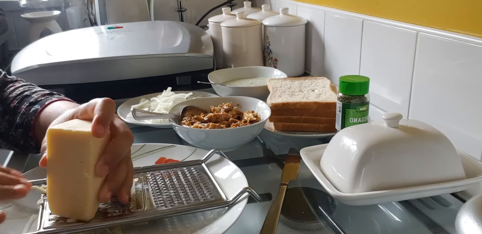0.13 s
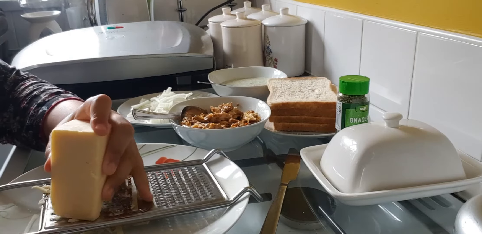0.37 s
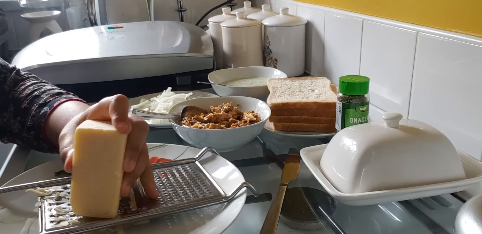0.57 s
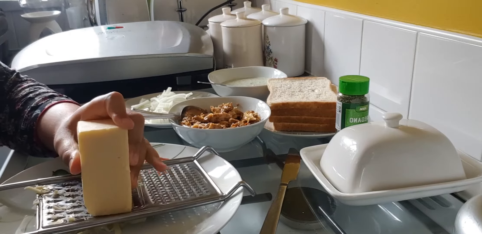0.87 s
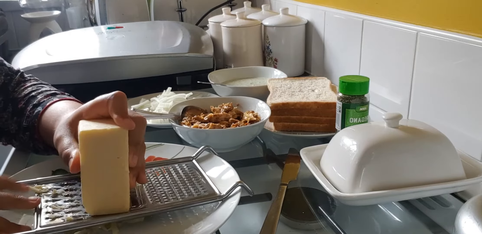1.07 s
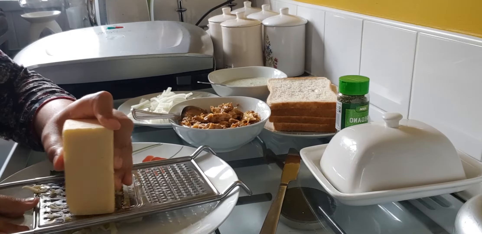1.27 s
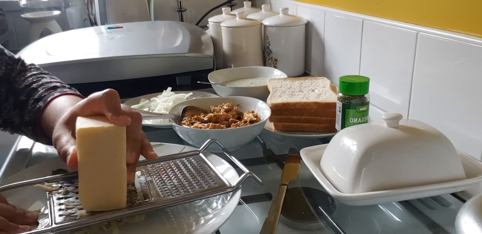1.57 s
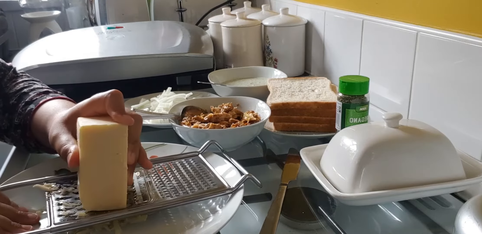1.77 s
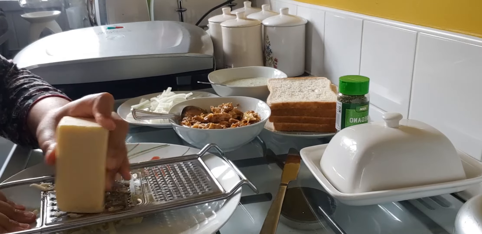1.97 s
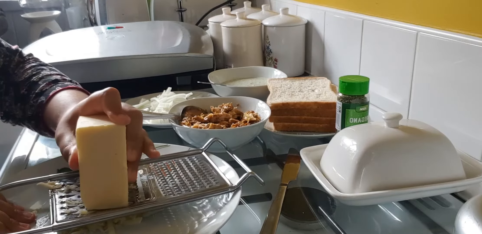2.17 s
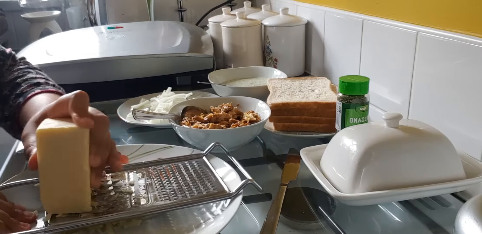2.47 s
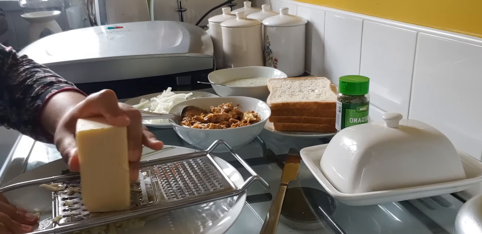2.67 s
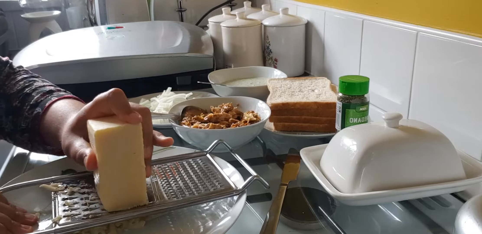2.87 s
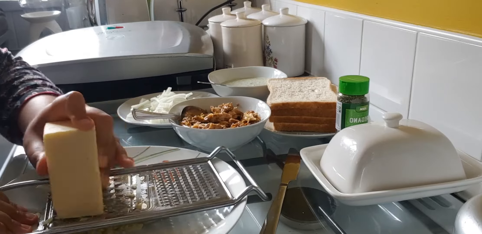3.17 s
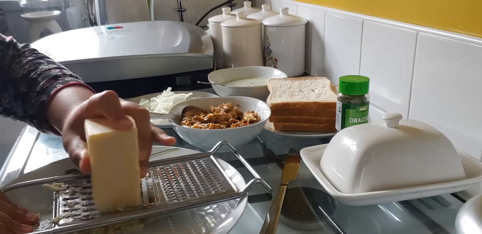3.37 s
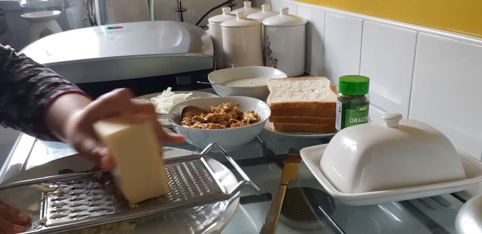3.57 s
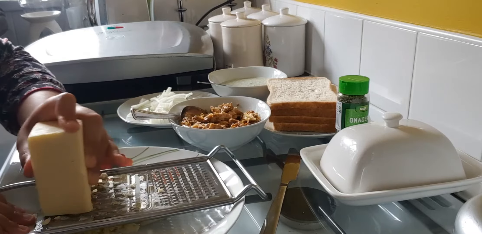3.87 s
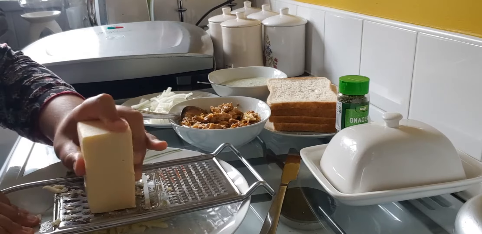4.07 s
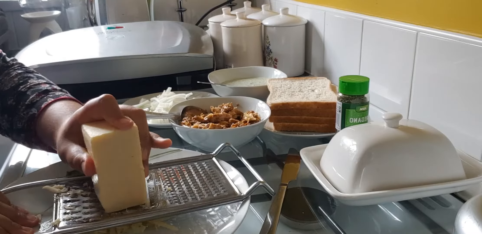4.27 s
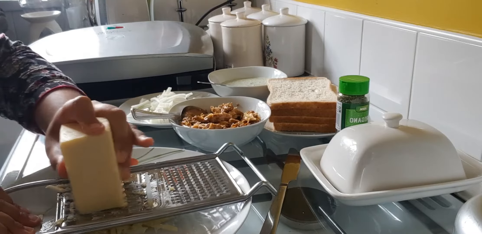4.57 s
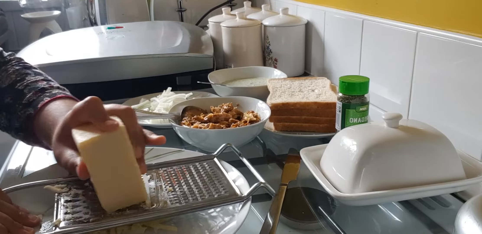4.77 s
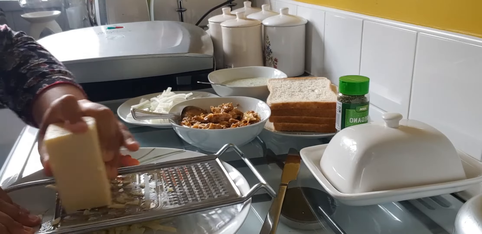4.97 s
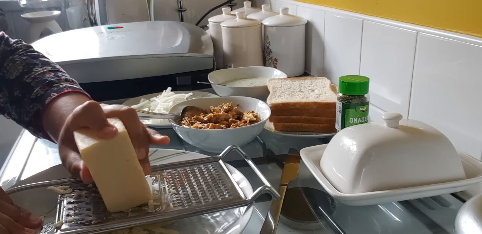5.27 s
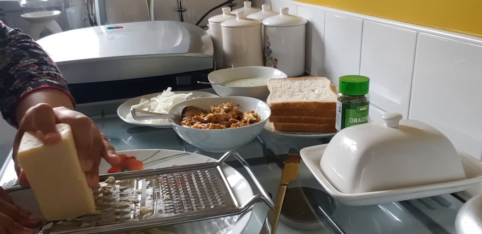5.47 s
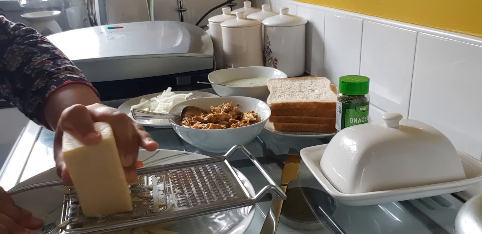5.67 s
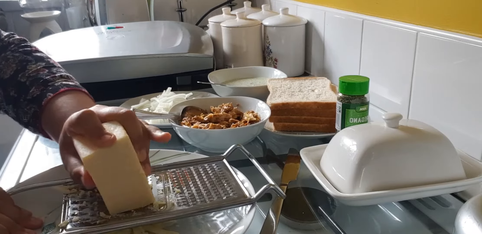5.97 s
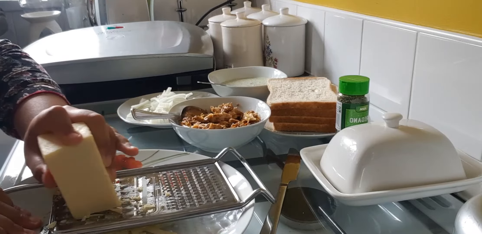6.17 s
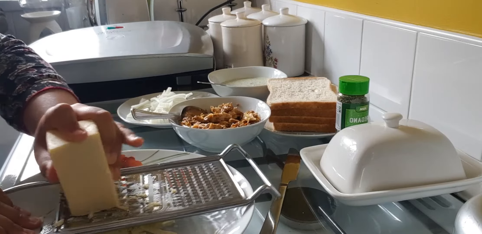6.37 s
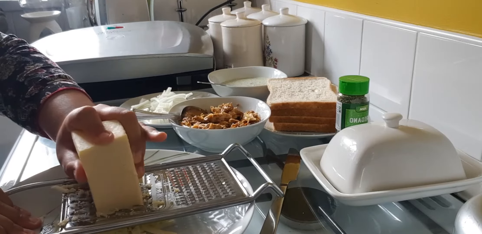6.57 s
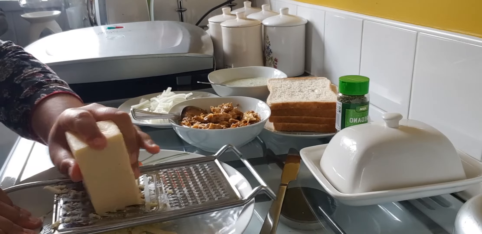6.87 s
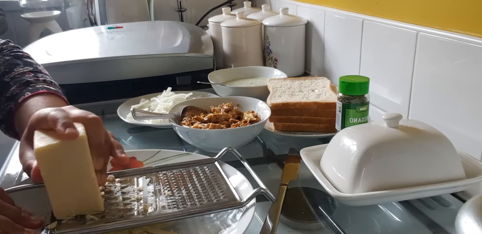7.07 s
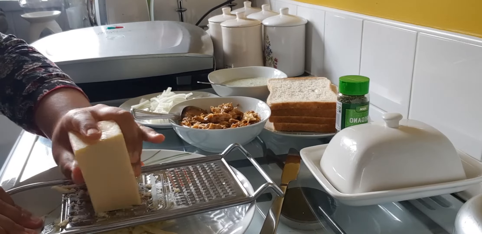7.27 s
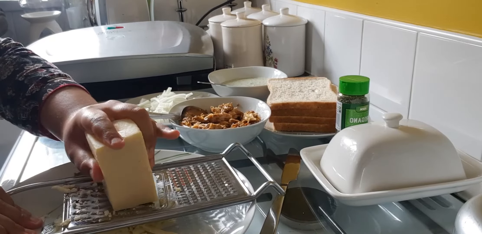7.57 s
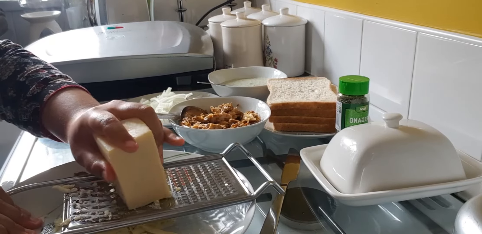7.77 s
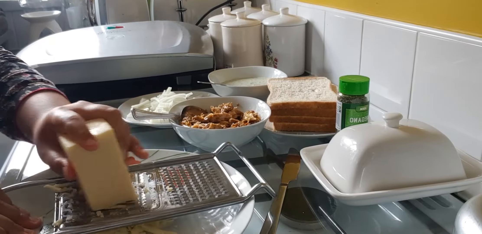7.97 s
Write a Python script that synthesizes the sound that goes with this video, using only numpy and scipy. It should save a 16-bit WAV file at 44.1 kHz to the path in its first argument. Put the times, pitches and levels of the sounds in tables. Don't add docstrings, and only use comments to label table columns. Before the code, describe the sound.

A block of cheese rasps unevenly along a steel grater, the loose metal clacking and ringing on a plate in a small tiled kitchen.

```python
import sys
import numpy as np
from scipy import signal
from scipy.fft import rfft, irfft, next_fast_len
from scipy.io import wavfile
from scipy.ndimage import uniform_filter1d

SR = 44100
rng = np.random.default_rng(int(sys.argv[2]) if len(sys.argv) > 2 else 0)


def put_to_file(sound):
    columns = np.atleast_2d(sound).T
    safe = np.clip(columns, -1, 1)
    whole_steps = np.round(safe * 32767)
    wavfile.write(sys.argv[1], SR, whole_steps.astype(np.int16))


def gain_from_db(level_db):
    decades = np.asarray(level_db, float) / 20
    return 10 ** decades


N = 380583
SWING_DB = 22


def evened(x):
    return x / np.sqrt(np.mean(x ** 2) + 1e-20)


def read(points, hz):
    f, value = np.transpose(points)
    return np.interp(np.log(hz + 1), np.log(f + 1), value)


def add(mix, s, sound):
    part = mix[..., round(s * SR):][..., :sound.shape[-1]]
    part += sound[..., :part.shape[-1]]


def resonate(x, hz, width_hz):
    b, a = signal.iirpeak(hz, hz / width_hz, SR)
    return signal.lfilter(b, a, signal.lfilter(b, a, x))


def causal(points):
    hz = np.linspace(0, SR / 2, 1025)
    return signal.minimum_phase(signal.firwin2(1023, hz, gain_from_db(2 * read(points, hz)) + 1e-9, fs=SR))


BAND_HZ = (3500, 700, 1600, 9000)


def bands(x, span):
    size = next_fast_len(x.shape[-1] + 512)
    octave = np.log2(np.fft.rfftfreq(size, 1 / SR) + 1)
    bells = np.exp(-3 * (octave - np.log2(BAND_HZ)[:, None]) ** 2) + 1e-30
    weights = (bells / bells.sum(0))[:, None]
    parts = irfft(rfft(x, size) * weights, size)[..., :x.shape[-1]]
    return parts / np.sqrt(np.mean(parts[..., :span] ** 2, axis=(1, 2), keepdims=True))


# frequency in Hz, level in dB per Hz.
STEEL_COLOUR = [(150, -24.5), (300, -17.5), (500, 0.5), (800, 1), (1000, -6.5), (1400, 1), (2000, -1.5),
                (3500, -6.5), (4500, -10), (5200, -11), (8000, -2), (12000, -1.5), (15700, -12)]
# frequency in Hz, t60 in seconds.
HISS_DECAY = [(200, 0.22), (530, 0.26), (1400, 0.26), (3700, 0.26), (9700, 0.21)]
# frequency in Hz, level in dB, t60 in seconds.
GRATER_MODES = [(342, -12, 0.36), (517, -4.5, 0.076), (551, -2, 0.35), (643, -2, 0.045), (739, -3, 0.45),
                (1168, -6.5, 0.049), (1310, -6, 0.2), (1710, -0.5, 0.061), (1870, -2.5, 0.6),
                (1953, -5, 0.3), (2760, -9.5, 0.25), (3085, 2, 0.079), (3480, -5, 0.084), (3560, -5, 0.03),
                (4017, -16, 0.067), (4200, -15, 0.05), (4400, -9, 0.22), (6100, -18, 0.26),
                (7450, -20.5, 0.057), (8200, -19.5, 0.6), (10520, -30, 0.23), (11000, -7.5, 0.12)]
# frequency in Hz, share heard differently at each port.
APART = [(250, 0.071), (600, 0.29), (1200, 0.61), (2500, 0.73), (9000, 0.93)]


def steel(stretch, modes_db, scatter_db, crack_db):
    hz, t = np.fft.rfftfreq(128, 1 / SR), np.arange(-1, 500) * 32 / SR
    shared, own = signal.stft(rng.standard_normal((2, 2, 16000)), nperseg=128, noverlap=96)[2]
    apart = np.clip(read(APART, hz), 0, 1)[:, None]
    z = np.sqrt(1 - apart) * shared[0] + np.sqrt(apart) * own
    z *= gain_from_db(-60 * np.maximum(t, 0) / read(HISS_DECAY, hz)[:, None] / stretch)
    hiss = signal.istft(z, nperseg=128, noverlap=96)[1][:, :16000]
    t = np.arange(16000) / SR
    cracked = hiss * (1 + gain_from_db(crack_db) * np.exp(-t / 0.014))
    hiss = signal.oaconvolve(cracked, causal(STEEL_COLOUR)[None], axes=1)[:, :16000]

    f, db, t60 = np.transpose(GRATER_MODES)[:, :, None]
    chance = rng.standard_normal((3, 2, len(f), 1))
    phase = 2.6 * chance[2] * np.clip(read(APART, f), 0, 1)
    f = f * (1 + .003 * chance[0, 0])
    fall_db = 60 * t / np.minimum(t60, .25) / stretch
    waves = np.sin(np.float32(2 * np.pi * f * t + phase))
    modes = (gain_from_db(db + scatter_db * chance[1, 0] - fall_db) * waves).sum(1)
    return evened(evened(hiss) + gain_from_db(modes_db) * evened(modes)) / np.sqrt(16000)


# hardest moment in seconds, pressure in dB, rise in seconds, fall in seconds, dullness in dB.
STROKES = [(.436, -70, 0.018, 0.1, 9.5), (.734, -49.5, 0.021, 0.066, -4), (.872, -67, 0.06, 0.08, 3),
           (1.485, -47, 0.033, 0.088, 2.5), (2.127, -45, 0.043, 0.056, -2), (2.338, -57, 0.029, 0.16, 0),
           (2.44, -61.5, 0.063, 0.064, -8), (3.271, -56, 0.057, 0.087, 1), (3.489, -42, 0.011, 0.13, 8),
           (3.65, -47, 0.036, 0.084, 5), (4.352, -48, 0.0195, 0.12, -0.5),
           (4.541, -49, 0.0265, 0.071, -1.5), (4.83, -54.5, 0.031, 0.13, 9),
           (4.999, -50, 0.033, 0.072, 2.5), (5.2, -62.5, 0.082, 0.12, -13),
           (6.048, -48.5, 0.049, 0.056, 5.5), (6.19, -53, .03, 0.19, -11.5), (7.246, -58.5, .04, 0.045, 0),
           (7.896, -55, 0.058, .1, 1.5), (8.175, -52.5, 0.022, 0.078, 1.5), (8.227, -60, 0.035, 0.062, 1.5),
           (8.608, -64, 0.019, 0.11, 2.5)]
# slip in seconds, pressure in dB, rise in seconds, dullness in dB.
RUN_UPS = [(2.558, -57.5, 0.062, 2), (3.066, -45.5, .035, 1), (3.452, -68, 0.054, 9.5),
           (3.945, -56, 0.045, 3), (4.605, -59, 0.07, 6.5), (5.303, -42, 0.026, -3), (6.14, -65.5, .04, 2),
           (6.341, -61.5, 0.049, -4), (6.875, -49, .045, -1)]
# hardest moment in seconds, level in dB, rise in seconds, fall in seconds.
SKIDS = [
    (3.636, -38, 0.0033, 0.029),
    (6.21, -43, .09, 0.17),
    (6.84, -64.5, .02, 0.1015),
    (3.47, -44.5, .006, 0.054),
]
SKID_SHARES_DB = (-12., -29, -25., 1.2)


def rasps():
    teeth_per_s, let_go_s = 1500, 0.003
    size_db = 3.5 * np.minimum(rng.exponential(1, N), 4)
    slips = rng.choice([-1., 1.], N) * gain_from_db(size_db) * (rng.random(N) < teeth_per_s / SR)
    clumps_db = 2.5 * evened(uniform_filter1d(rng.standard_normal(N), 300))
    slips = evened(slips * gain_from_db(clumps_db))
    out = np.zeros((2, N))
    rows = STROKES + [(s, db, rise, let_go_s, dull) for s, db, rise, dull in RUN_UPS]
    rows = rows + [(*row, None) for row in SKIDS]
    for s, db, rise, fall, dull_db in rows:
        t = np.arange(-2 * rise, min(2 * fall, (N - 2) / SR - s), 1 / SR)
        start = s + t[0]
        pressure = gain_from_db(db - SWING_DB * np.maximum(-t / rise, t / fall))
        force = pressure * slips[round(start * SR):][:len(t)]
        if dull_db is None:
            shares_db = SKID_SHARES_DB
        else:
            shares_db = [0, dull_db, -2 + 0.73 * dull_db, -3 + .1 * dull_db]
        ring = steel(stretch=.55, modes_db=-12, scatter_db=3.5, crack_db=-10.0)
        parts = bands(ring, span=16000) / np.sqrt(16000)
        answer = (gain_from_db(shares_db)[:, None, None] * parts).sum(0)
        add(out, start - .011, signal.fftconvolve(answer, force[None], axes=1))
    return out


# start in seconds, blow in dB, dullness in dB, fizz in dB.
CLACKS = [(0.7107, -61, 8, 14), (0.9413, -32, -2, -6), (1.4743, -41.5, 4.5, -14), (1.674, -50, 2, 5),
          (2.5662, -34.5, -2, -7.5), (3.0719, -22.5, -7.5, -3.5), (3.459, -24, -7, 1.5),
          (3.477, -23, -1, -7.5), (3.6105, -34, 3, -29), (3.6371, -40.5, 9, 2.5), (3.8126, -66, 12, 2),
          (3.9535, -31.5, -1.5, -0.5), (4.617, -31, -5.5, -6), (4.816, -36.5, -16, -11),
          (5.0508, -27.5, -3, -4), (5.3064, -23, -9.5, -9), (5.4945, -27, -3, -4),
          (6.1454, -26, -10.5, -3.5), (6.3475, -11, -8.5, 0), (6.88, -12, -11.5, -2), (7.1142, -20, -8, -2),
          (7.837, -54, -1, -3), (7.8875, -49, 4, -2), (8.6026, -49, -5.5, -9)]


def clacks():
    out, t = np.zeros((2, N)), np.arange(2000) / SR
    rattle_s, landing_s = 0.0033, 0.00046
    highpass = signal.butter(2, 330, "high", fs=SR, output="sos")
    for s, db, body_db, fizz_db in CLACKS:
        contacts = 0.89 * rng.standard_normal(2000) * (rng.random(2000) < .12) * np.exp(-t / rattle_s)
        contacts[40] = 2.2
        contacts *= np.minimum(t / landing_s, 1)
        ring = steel(stretch=1.161, modes_db=-12.5, scatter_db=3.0, crack_db=6.5)
        early = np.exp(-(np.arange(ring.shape[1]) / SR / .07) ** 2)
        blow = signal.fftconvolve(early * ring, contacts[None], axes=1)
        add(blow, .004, np.linalg.norm(contacts) * np.sqrt(1 - early ** 2) * ring)
        parts = bands(signal.sosfilt(highpass, blow), span=600)
        shares_db = np.array([0, body_db, -2 + 0.63 * body_db, fizz_db])
        add(out, s, (gain_from_db(db - 8.5 + shares_db)[:, None, None] * parts).sum(0))
    return out


# start in seconds, pitch in Hz, level in dB, t60 in seconds.
RINGS = [(6.882, 1700, -28, .22), (6.882, 3350, -26, .06), (6.882, 4450, -35, .35), (6.882, 2700, -35, .15),
         (6.882, 11900, -40, .2), (6.882, 7390, -40, .16), (7.116, 490, -37.5, 0.16),
         (7.116, 1308, -41, 0.23), (7.116, 4370, -47, .2), (7.116, 5852, -51, 0.38),
         (7.116, 12000, -44, .11), (6.35, 764, -30, .1), (6.35, 3080, -30, .13), (6.35, 4370, -36, .2),
         (6.35, 8037, -38, .2), (6.35, 9200, -38, .11), (6.146, 1500, -42, 0.17), (6.146, 4400, -50, .2),
         (3.495, 11000, -43.5, .1), (3.462, 3100, -40, .08), (5.308, 3000, -42, 0.22),
         (5.308, 10600, -42, .15), (5.377, 1980, -53, .25), (5.498, 1800, -48, 0.28),
         (4.345, 3000, -49, .1), (4.545, 1800, -52, .12), (6.045, 1950, -58, .2), (.943, 1800, -44, 0.087),
         (5.053, 3450, -43, .1), (4.62, 3900, -50, .08)]


def rings():
    out, t = np.zeros((2, N)), np.arange(12000) / SR
    for s, hz, db, t60 in RINGS:
        a, b = rng.uniform(0, 2 * np.pi, (2, 2, 1))
        upper_hz = hz * 1.01
        pair = np.sin(2 * np.pi * hz * t + .4 * a) + .6 * np.sin(2 * np.pi * upper_hz * t + b)
        wobble_db = 2.5 * evened(uniform_filter1d(rng.standard_normal(12000), 500))
        add(out, s, gain_from_db(db + wobble_db - 60 * t / t60) * np.minimum(t / .002, 1) * pair)
    return out


# start in seconds, level in dB, dull share in dB.
TICKS = [(0.5597, -64, -19), (2.911, -70, -7), (4.3961, -43.5, -5), (4.8734, -56, -14), (5.3759, -46, 6),
         (5.7036, -60, 0), (1.88, -66, -7), (3.832, -50, -20), (6.179, -37, -5), (6.2105, -23, -13.5),
         (6.8197, -37, -15), (8.2193, -60.5, 18)]


def ticks():
    out, t = np.zeros((2, N)), np.arange(3000) / SR
    lead_s = .0008
    soft_lowpass = signal.butter(2, 8500, fs=SR, output="sos")
    for s, db, dull_db in TICKS:
        snap = rng.standard_normal((2, 3000)) * (np.exp(-t / .0006) + gain_from_db(-20) * np.exp(-t / .018))
        snap = signal.sosfilt(soft_lowpass, snap)
        middle, _, _, bright = bands(snap[0] + .5 * snap, span=60)
        add(out, s + lead_s, gain_from_db(db - 0.5) * (bright + gain_from_db(dull_db) * middle))
    return out


# start in seconds, level in dB, centre in Hz, width in Hz, length in seconds.
GRITS = [(3.476, -31, 900, 1400, .07), (3.51, -35, 700, 1005, .06), (3.612, -45, 2000, 2500, .02),
         (3.638, -38, 800, 1100, 0.046), (3.70, -50, 1200, 1600, 0.046), (3.807, -48, 750, 1000, .045),
         (4.318, -56, 703, 600, 0.094), (4.621, -47, 520, 400, .03), (4.885, -55.5, 1000, 1200, 0.063),
         (4.95, -56, 600, 600, .05), (5.055, -44, 560, 500, .035), (0.841, -67, 397, 400, 0.054),
         (0.949, -46, 650, 400, .025), (1.676, -57, 900, 1000, 0.043), (7.886, -56, 1000, 1400, 0.039),
         (7.08, -56, 11000, 6000, .012), (7.236, -53, 3000, 2000, .015), (5.516, -43, 1500, 2000, 0.046),
         (5.976, -62.5, 650, 500, .05), (6.025, -58, 650, 500, .04), (6.347, -18, 4200, 3000, .012),
         (6.347, -20, 12500, 7000, .01), (6.35, -31, 1500, 900, .05), (6.341, -42, 4000, 6000, .01),
         (6.8805, -21, 2600, 2500, .012), (7.107, -44, 3000, 5000, .01), (7.115, -41, 700, 700, .04),
         (3.476, -31, 2200, 1800, .04), (3.64, -46, 4500, 4000, .02), (7.89, -53, 650, 400, .04),
         (8.17, -58, 700, 500, .05), (6.19, -44, 13500, 5000, .12), (3.636, -44, 13000, 5000, .05),
         (1.47, -50, 600, 500, .06), (1.48, -54, 3000, 500, .05), (2.115, -56, 600, 400, .05),
         (.728, -60, 3300, 500, .03)]


def grits():
    out, t = np.zeros((2, N)), np.arange(8000) / SR
    grains_per_s = 900
    for s, db, hz, width_hz, length_s in GRITS:
        bursts = (rng.random(8000) < grains_per_s / SR) * rng.exponential(1, 8000)
        grains = rng.standard_normal(8000) * (.3 + bursts)
        echo = rng.standard_normal((3, 300)) * np.exp(-t[:300] / 0.0017)
        grit = signal.fftconvolve(grains[None], echo[0] + .6 * echo[1:], axes=1)[:, :8000]
        shape = np.minimum(t / (.15 * length_s), 1) * gain_from_db(-SWING_DB * t / (2 * length_s))
        add(out, s, gain_from_db(db) * shape * evened(resonate(grit, hz, width_hz)))
    return out


# start in seconds, level in dB, pitch in Hz, length in seconds.
THUDS = [(.72, -44.5, 610, 0.037), (1.684, -49.5, 560, 0.037), (6.352, -31.5, 726, 0.027),
         (0.842, -53.5, 580, .07), (2.378, -68, 750, .15), (3.49, -46, 1260, .05), (3.65, -52, 600, .04),
         (2.866, -68, 750, .1), (2.977, -70, 700, .05), (4.884, -55, 700, .1), (5.509, -44.5, 512, 0.064),
         (5.62, -57.5, 610, 0.046), (6.76, -62.5, 650, 0.039), (7.845, -53, 543, 0.022),
         (7.895, -48, 514, 0.037), (8.16, -55, 1340, 0.05), (8.46, -78.5, 547, .08),
         (8.604, -53.5, 594, 0.034)]


def thuds():
    out, t = np.zeros((2, N)), np.arange(8000) / SR
    for s, db, hz, length_s in THUDS:
        push = rng.standard_normal((3, 8000))
        shape = np.minimum(t / 0.0055, 1) * gain_from_db(-SWING_DB * t / (2 * length_s))
        add(out, s, gain_from_db(db) * shape * evened(resonate(push[0] + .5 * push[1:], hz, 0.19 * hz)))
    return out


# start in seconds, end in seconds, level in dB.
CREEPS = [
    (0.162, 0.726, -72),
    (1.0, 1.42, -79),
    (2.197, 2.55, -73.5),
    (2.686, 3.06, -71.5),
    (6.544, 6.818, -99),
]


def creep():
    t, level = np.arange(N) / SR, np.zeros(N)
    for start, end, db in CREEPS:
        level += gain_from_db(db) * np.sin(np.pi * np.clip((t - start) / (end - start), 0, 1)) ** .5
    grain = gain_from_db(1.3 * evened(uniform_filter1d(rng.standard_normal(N), 800)))
    return level * grain * evened(resonate(rng.standard_normal((2, N)), hz=1500, width_hz=300))


# frequency in Hz, width in Hz.
TABLE_MODES = [
    (62, 29),
    (110, 21.4),
    (290, 156),
]
# time in seconds, level in dB.
LEAN = [(0.0, -82), (0.33, -65), (2.43, -60), (3.0, -52.5), (3.41, -64), (3.75, -43), (4.2, -70.5),
        (5.14, -62.5), (5.43, -52), (5.84, -78.5), (6.27, -69.5), (6.63, -72.5), (6.87, -57), (7.11, -74),
        (7.69, -71), (8.63, -60)]
LEAN_SHARE_DB = (-1.1, -9.5, -21.5)
# peak in seconds, low mode in dB, upper mode in dB, plate in dB.
JOLTS = [(.36, -60, -59.5, -72), (.96, -64, -58.5, -64), (1.494, -51, -40, -43), (1.56, -63, -51, -80),
         (1.68, -81, -80, -59), (2.139, -62, -59, -58), (2.48, -60, -58.5, -74), (3.1, -42.5, -69, -57),
         (3.17, -51, -63, -65), (3.24, -65, -55.5, -67), (3.492, -39, -37, -38), (3.658, -51, -40.5, -41.5),
         (3.85, -53, -57, -60.5), (4.04, -56.5, -61.5, -75), (4.45, -53, -45.5, -58),
         (4.64, -58.5, -64, -66), (4.93, -48.5, -44, -53), (5.1, -58.5, -64, -58),
         (5.43, -66, -60.5, -63.5), (6.2, -70, -57.5, -60), (6.3, -56, -80, -78.5),
         (6.389, -73, -51, -46.5), (6.49, -66.5, -52.5, -68), (6.73, -53, -66.5, -79),
         (6.9, -54, -45.5, -43.5), (7.07, -57, -74.5, -79), (7.16, -55, -54, -53.5),
         (7.399, -60.5, -69, -84), (7.93, -63, -61, -69), (8.601, -57, -72.5, -73)]
JOLT_RISE_DB_PER_S = (249.5, 500, 500)
JOLT_FALL_DB_PER_S = (113, 122, 172.5)


def table():
    t, out = np.arange(0, N, 64) / SR, np.zeros((2, N))
    s, *jolts_db = np.transpose(JOLTS)[:, :, None]
    lean_db = np.interp(t, *np.transpose(LEAN))
    for k, ((hz, width_hz), apart) in enumerate(zip(TABLE_MODES, (.1, .15, .5))):
        away_db = np.maximum(JOLT_RISE_DB_PER_S[k] * (s - t), JOLT_FALL_DB_PER_S[k] * (t - s))
        force = gain_from_db(lean_db + LEAN_SHARE_DB[k]) + gain_from_db(jolts_db[k] - away_db).sum(0)
        push = rng.standard_normal((2, N))
        drone = evened(resonate(push[0] + apart * push, hz, width_hz))
        out += np.interp(np.arange(N) / SR, t, force) * drone
    return out


# frequency in Hz, level in dB per Hz.
AIR = [(12, -41), (20, 3.5), (79, -6.5), (160, -21), (230, -12), (372, -24.5), (772, -20.5), (1140, -24),
       (5070, -31), (7300, -32.5), (11100, -24), (15200, -24), (16500, -34)]
# frequency in Hz, correlation.
SAME = [(60, 0.37), (240, -0.21), (950, 0.15), (3770, 0.093), (15000, 0.37)]
# frequency in Hz, depth in dB.
PATCHY = [(30, 4), (150, 1), (3000, 1.3), (15000, 1.5)]
# time in seconds, level in dB.
AIR_DRIFT = [(0, 1), (.9, 3), (1.25, 0), (2.3, 2.5), (2.8, -1), (3.7, 3), (4.22, -1.5), (4.6, 2), (5.85, 0),
             (6.6, 4.5), (7.1, 3), (7.3, -4.5), (7.74, -5.5), (8.63, -1.1)]


def air():
    frames, hz = N // 256 + 5, np.fft.rfftfreq(1024, 1 / SR)
    a, b, c, d, patches = rng.standard_normal((frames, 513, 5)).T
    patches = evened(uniform_filter1d(uniform_filter1d(patches, 12, 0), 14, 1))
    same = np.clip(read(SAME, hz), -1, 1)[:, None]
    left = a + 1j * b
    z = np.array([left, same * left + np.sqrt(1 - same ** 2) * (c + 1j * d)])
    drift_db = np.interp(np.arange(frames) * 256 / SR, *np.transpose(AIR_DRIFT))
    z *= gain_from_db(read(AIR, hz)[:, None] + read(PATCHY, hz)[:, None] * patches + drift_db)
    return gain_from_db(-64.5) * evened(signal.istft(z, nperseg=1024, noverlap=768)[1][:, :N])


# frequency in Hz, left over right in dB.
LEFT_DB = [(60, -6.5), (250, 1.5), (550, 3), (1650, 3), (5500, 3.5), (15000, 0)]


def ports(x):
    size, lag_s = next_fast_len(N), 3 / SR
    hz = np.fft.rfftfreq(size, 1 / SR)
    half = gain_from_db(read(LEFT_DB, hz) / 2) * np.exp(-1j * np.pi * hz * lag_s)
    return irfft(rfft(x, size) * np.array([half, 1 / half]), size)[:, :N]


def scene():
    grater = rasps() + clacks() + rings() + ticks() + grits() + thuds() + creep()
    return ports(grater) + table() + air()


def roll_off(x):
    return signal.sosfilt(signal.butter(12, 16850, fs=SR, output="sos"), x)


def record(dry):
    edge_hz, top_hz, leak_db = 15850, 16750, -32
    limited = .95 * np.tanh(dry / .95)
    low, wide = (signal.oaconvolve(limited, signal.firwin(255, hz, window=("kaiser", 9), fs=SR)[None], "same")
                 for hz in (edge_hz, top_hz))
    return roll_off(low + gain_from_db(leak_db) * (wide - low))


dry = scene()
out = record(dry)
put_to_file(out)
```